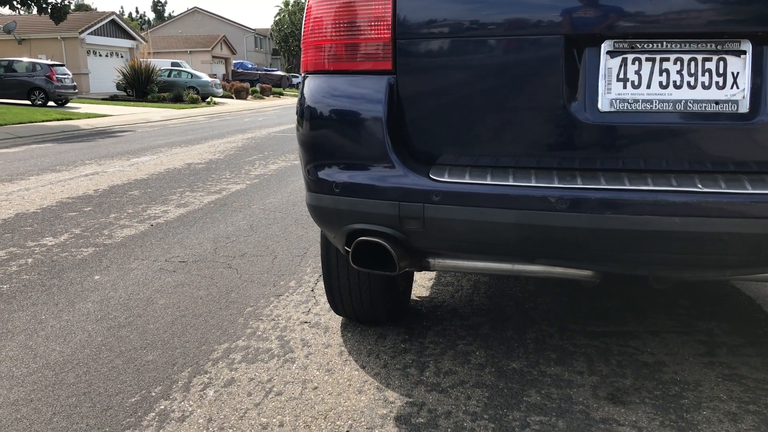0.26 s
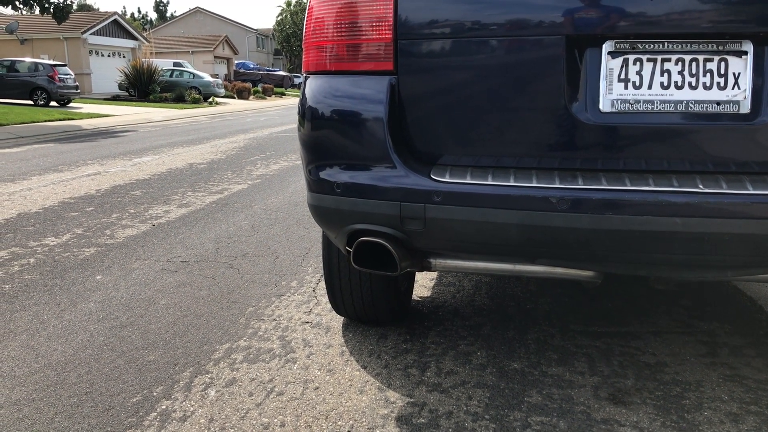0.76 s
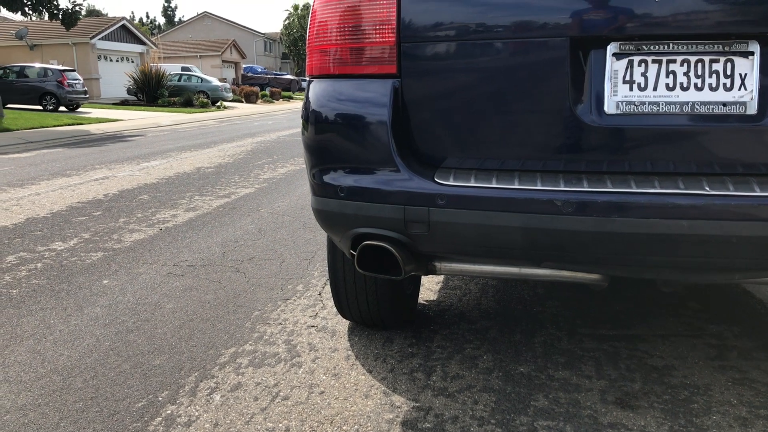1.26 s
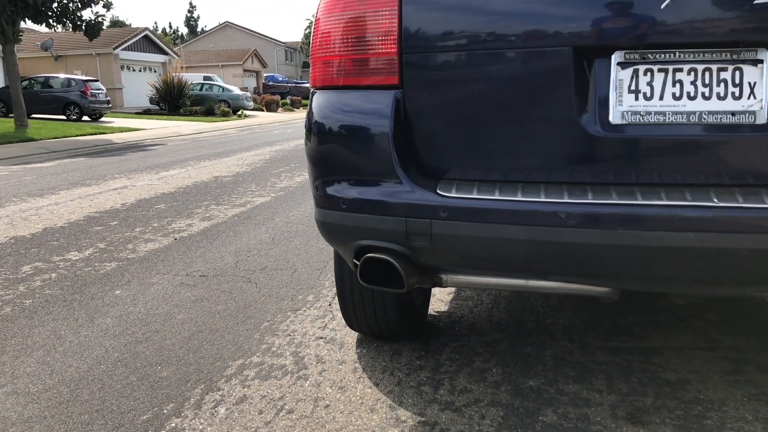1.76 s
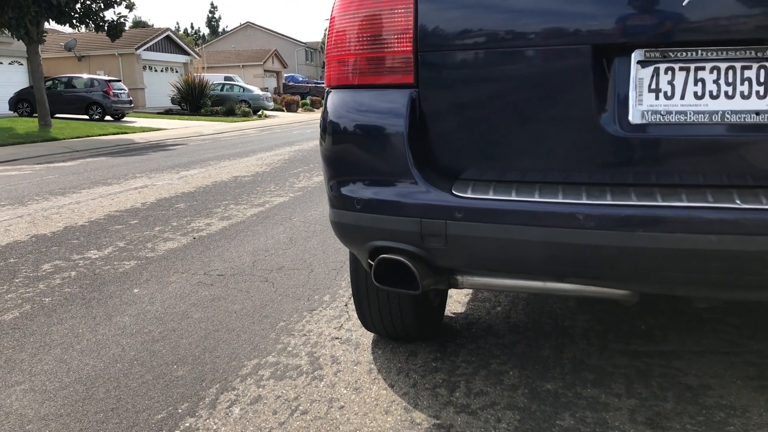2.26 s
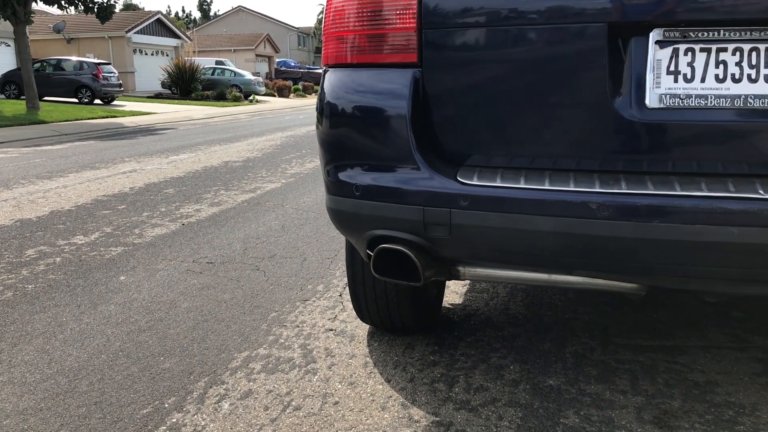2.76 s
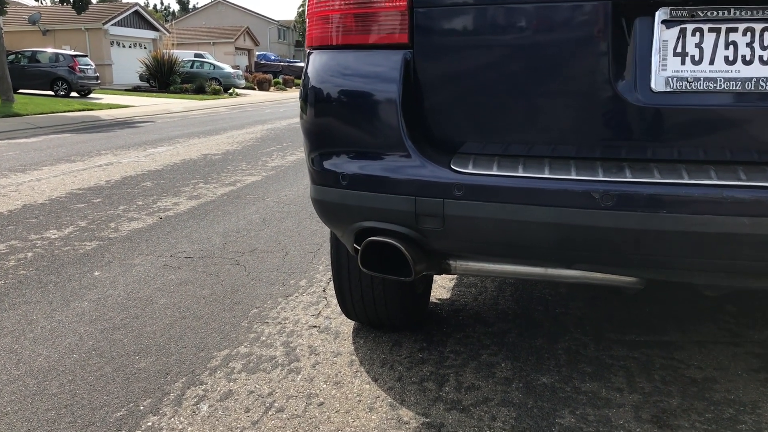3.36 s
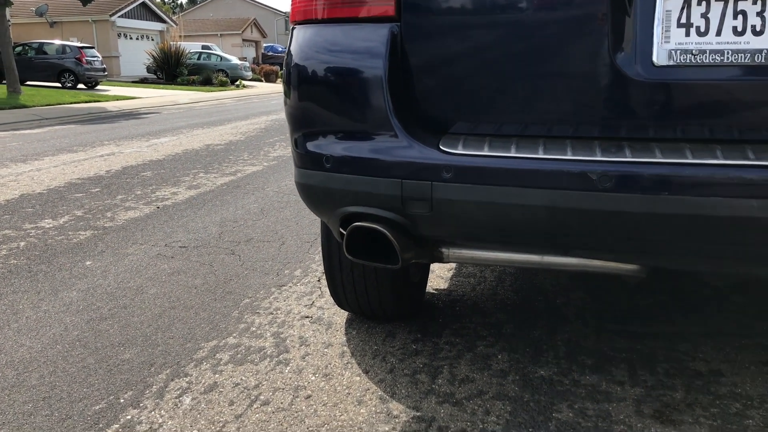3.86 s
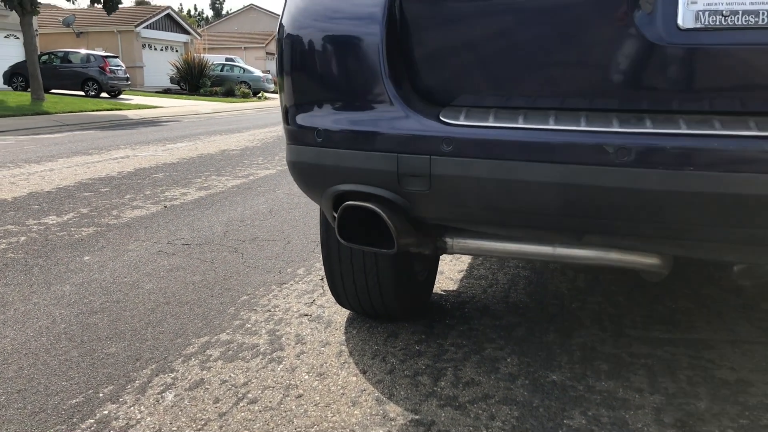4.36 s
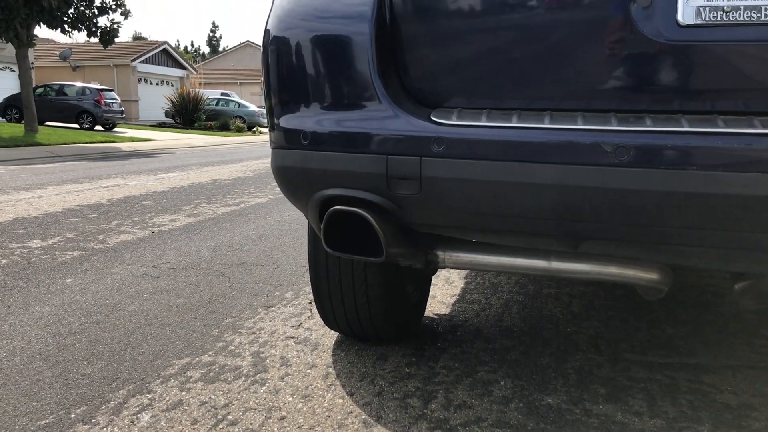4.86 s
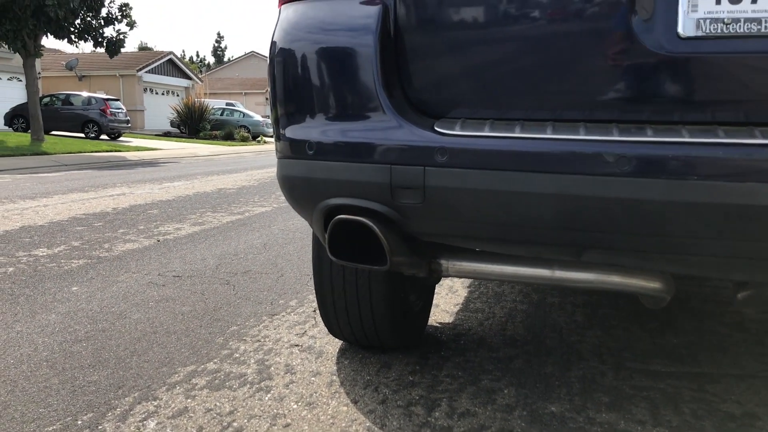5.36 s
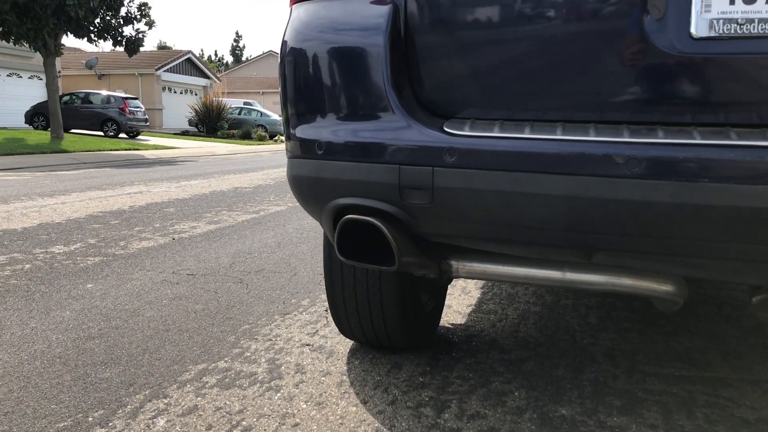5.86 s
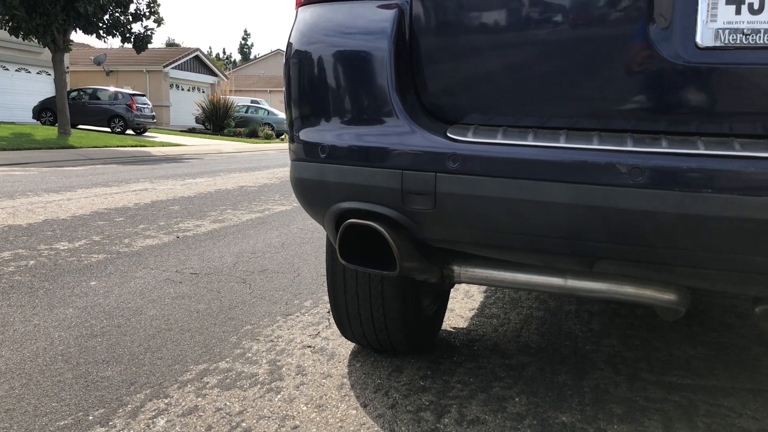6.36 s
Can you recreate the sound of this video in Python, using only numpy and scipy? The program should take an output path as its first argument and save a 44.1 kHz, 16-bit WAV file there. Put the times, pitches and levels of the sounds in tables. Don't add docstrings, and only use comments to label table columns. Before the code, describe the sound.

Close behind a vehicle's tailpipe on a quiet residential street, a V8 idles from 0 s with a deep, uneven, bubbling boom, sagging slightly around 0.75 s. A thin, unsteady high whine and soft street noise lie beneath it, and a shoe scrapes briefly on grit at 0.2 s. From about 1.0 s the engine climbs; a tiny spit of air at 1.3 s leads into a full, raspy roar peaking near 1.8 s, with a cluster of hard pops until 2.0 s. The pitch slides down to a lumpy rumble by 3.4 s. At 4.2 s the throttle opens again, with another faint scuff at 4.4 s, and the revs rush to a higher, harsher peak around 5.0 s, crackling densely and slightly clipping. They drop quickly, hover near 5.6 s, then sink towards a burble by 6.6 s, with a long faint scrape after 6 s.

```python
import sys
import numpy as np
from scipy import signal
from scipy.fft import rfft, irfft, next_fast_len
from scipy.io import wavfile
from scipy.ndimage import uniform_filter1d, map_coordinates

SR = 44100
rng = np.random.default_rng(int(sys.argv[2]) if len(sys.argv) > 2 else 0)


def unload_audio(sound):
    columns = np.transpose(np.atleast_2d(sound))
    steps = np.round(np.clip(columns, -1, 1) * 32767)
    wavfile.write(sys.argv[1], SR, steps.astype(np.int16))


def volts(x):
    e = np.asarray(x, float) / 20
    return 10 ** e


N = 291060
T = np.arange(N) / SR


def unit(x):
    return x / np.sqrt(np.mean(x ** 2) + 1e-20)


def steady(x, reference, seconds):
    size = int(seconds * SR)
    power = uniform_filter1d(uniform_filter1d(reference ** 2, size), size)
    return x / np.sqrt(np.abs(power) + 1e-12)


def curves(rows):
    seconds, *columns = np.transpose(rows)
    return [np.interp(T, seconds, column) for column in columns]


def wobble(rate, step=1):
    knots = rng.standard_normal(int(N * rate / SR) + 4)
    return map_coordinates(knots, [T[::step] * rate])


def filtered(x, response):
    size = next_fast_len(N + SR // 2)
    return irfft(rfft(x, size) * response(np.fft.rfftfreq(size, 1 / SR)), size)[:N]


def resonances(modes):
    def response(f):
        total = 0
        for k, (hz, width, db) in enumerate(modes):
            damping = 1j * f * width
            total = total + (-1) ** k * volts(db) * damping / (hz * hz - f * f + damping)
        return total
    return response


def coloured(spectrum):
    hz, db = np.transpose(spectrum)
    noise = rng.standard_normal(N)
    return unit(filtered(noise, lambda f: volts(np.interp(np.log(f + 1), np.log(hz), db))))


def puffs(at, sizes, t60, noisy):
    clicks = np.bincount(at, sizes, N)[:N]
    gusts = signal.lfilter([1], [1, -volts(-60 / (t60 * SR))], clicks)
    gusts = uniform_filter1d(gusts, size=40, origin=19)
    return clicks + noisy * gusts * rng.standard_normal(N)


# time in seconds, speed in firings per second.
FIRING_RATE = [(0, 39), (.24, 39.6), (.75, 34.5), (.98, 35), (1.2, 45), (1.32, 56.3), (1.76, 102.5),
               (2.64, 63.2), (3.4, 42), (4.2, 47.3), (4.4, 55), (4.79, 87.5), (4.93, 116.5), (5.04, 125.5),
               (5.17, 121.7), (5.5, 83.5), (5.66, 83.5), (6.6, 49)]
# time in seconds, opening from 0 to 1.
THROTTLE_OPENING = [(0, 0.03), (.95, 0.07), (1.3, 0.67), (1.68, 0.77), (1.82, 0.79), (2.12, 0.34),
                    (2.5, 0.37), (2.83, 0.29), (3.5, 0), (4.2, 0), (4.58, 0.64), (4.78, 0.93), (4.96, 0.49),
                    (5.05, 0.37), (5.35, 0), (5.88, 0.08), (6.25, 0.21), (6.6, 0)]
# full from and until in seconds, strength from 0 to 1.
PIPE_BURNS = [
    (1.76, 2.019, .7),
    (4.999, 5.125, 0.86),
]
BURN_RISE_S, BURN_FALL_S = 0.33, 0.1
# time in seconds, gain in dB.
GAIN_CONTROL = [(0, 1.5), (1.2, 1.5), (2.3, -2.5), (3.2, 2), (4.5, 4), (5.5, -0.5), (5.8, -6.5), (6.1, 4),
                (6.6, 4)]


def engine():
    rate = uniform_filter1d(curves(FIRING_RATE)[0], size=2000)
    throttle, = curves(THROTTLE_OPENING)
    burn = np.zeros(N)
    for start, end, strength in PIPE_BURNS:
        burn += strength * np.interp(T, [start - BURN_RISE_S, start, end, end + BURN_FALL_S], [0, 1, 1, 0])
    octaves = np.log2(rate / 50)
    controls = np.array([np.ones(N), octaves, throttle, burn, curves(GAIN_CONTROL)[0]])
    return rate, lambda law: np.dot(law, controls)


def firings(turns, lag):
    late = np.floor(turns - lag)
    at = np.flatnonzero(np.diff(late)) + 1
    return at, late[at].astype(int)


def in_pipe(points, hz):
    f, db = np.transpose(points)
    return np.interp(np.log(hz), np.log(f), db)


# level in dB of the crank line k/8 above a firing order, k = 0..7.
CRANK_LINES = [0, -14, -8, 0, -17.5, -7, -1, -10.5]
# frequency in Hz, width in Hz, level in dB.
PIPE_MODES = [(44, 6.3, 1.5), (97.4, 28.1, -0.5), (118.5, 11.4, -2), (139.6, 14.1, -0.5),
              (192.5, 13.5, -0.5)]


def burble(rate, turns):
    step, grid_hz = 20, np.arange(600.)
    pipe = resonances(PIPE_MODES)
    gain = np.abs(pipe(grid_hz)) / (1 + (grid_hz / 235) ** 6)
    lines = np.zeros(len(T[::step]))
    for k in range(4, 41):
        if k in (8, 16):
            continue
        order = k / 8
        size = volts(CRANK_LINES[k % 8] + 2.2 * wobble(4, step)) * np.interp(order * rate[::step], grid_hz, gain)
        thin = min(order, 1) ** 0.38
        phase = 2 * np.pi * (order * turns[::step] + rng.random()) + .22 * wobble(5, step)
        lines += thin * size * np.cos(phase)
    lines = unit(signal.resample_poly(lines, step, 1)[:N])
    turbulence = unit(filtered(rng.standard_normal(N), lambda f: pipe(f) * np.minimum(f / 110, 1) ** 2))
    return lines + np.clip(rate / 550, 0, 1) * turbulence


# frequency in Hz, width in Hz, level in dB.
UPPER_PIPE_MODES = [(223.3, 16.7, 4.5), (278.6, 16.5, 2), (301.2, 12.8, 0), (339.3, 24.3, -1.5),
                    (402.1, 7.5, -4.5), (438.2, 11, -7.5), (514, 35, -13)]
# frequency in Hz, gain in dB.
FIRST_ORDER_GAIN = [(41, -40), (48, -19.5), (54, -28.5), (62, -24), (71, -33), (81, -16.5), (105, -11),
                    (126, -15.5)]
SECOND_ORDER_GAIN = [(70, -31), (80, -25.5), (113, -27.5), (128, -30), (142, -23), (160, -44.5),
                     (192, -32.5), (230, -68.5)]
# dB at 50 firings per second, dB per octave of speed,
# dB at full throttle, dB at full afterburn, share of the gain control.
FIRST_LAW = (-1.24, -0.83, 11.5, -6, 0.38)
SECOND_LAW = (0.22, 0.3, 8.5, 14.5, .6)
BURBLE_LAW = (-30.5, 3, 12, 0, 0.41)
ROAR_LAW = (-46.5, 14.5, 8, 7, 0.24)
STALL_RATE, STALL_DB_PER_OCT = 40.2, 18


def boom(rate, turns, level):
    first_db = level(FIRST_LAW) + in_pipe(FIRST_ORDER_GAIN, rate)
    second_db = level(SECOND_LAW) + in_pipe(SECOND_ORDER_GAIN, 2 * rate) + 3.0 * wobble(6)
    clean = volts(first_db) * np.cos(2 * np.pi * turns) + volts(second_db) * np.cos(4 * np.pi * turns - .6)

    low = burble(rate, turns)
    upper = filtered(low, lambda f: f > 125)
    stall_db = STALL_DB_PER_OCT * np.minimum(np.log2(rate / STALL_RATE), 0)
    burbling = volts(level(BURBLE_LAW) + stall_db) * steady(low, upper, seconds=0.14)

    at, number = firings(turns, lag=0.2977)
    sizes = volts(3.5 * rng.standard_normal(1000)[number % 1000])
    gas = unit(puffs(at, sizes, t60=.04, noisy=.08)) + .45 * rng.standard_normal(N)
    roar = filtered(gas, resonances(UPPER_PIPE_MODES))
    return np.sqrt(2) * clean + burbling + volts(level(ROAR_LAW)) * steady(roar, roar, seconds=0.085)


def aside(f):
    return 1 / (1 + 1.4j * f / 6000 - (f / 6000) ** 2) ** 2


# frequency in Hz, width in Hz, level in dB.
BOX_MODES = [(608, 73, -4), (657.5, 32, 3), (885, 191, 3), (1054, 75, -4), (1104, 41, -10.5),
             (1262, 120, -10.5)]


def box(f):
    return resonances(BOX_MODES)(f) * aside(f) / (1 + 1j * f / 2500)


def tip_mode(mode):
    hz, width, db = mode
    return lambda f: volts(db) * resonances([(hz, width, 0)])(f) ** 2 * aside(f)


# frequency in Hz, width in Hz, level in dB.
TIP_MODES = [(1859, 550, -2), (2744, 450, -5), (3414, 280, -6.5), (4200, 1800, -13), (5800, 1300, -14.5)]
BOX_LAW = (-55, 11, 5, 16.5, 1.14)
TIP_LAW = (-58.5, 6.5, 18, 9, 0.62)


def rasp(turns, box_db, tip_db):
    at, number = firings(turns, lag=.3)
    luck = rng.standard_normal((1000, 1 + len(TIP_MODES)))[number % 1000]
    opened = np.clip((box_db + 62) / 25, .5, .62)
    swirl = (1 - opened) * volts(2.6 * wobble(18))

    def ring(response, size_db):
        blasts = unit(puffs(at, volts(size_db), t60=.021, noisy=.4))
        return filtered(opened * blasts + swirl * rng.standard_normal(N), response)

    low = ring(box, 2.4 * luck[:, 0])
    tip = np.zeros(N)
    for k, mode in enumerate(TIP_MODES):
        tip += ring(tip_mode(mode), 1.5 * luck[:, 0] + 3 * luck[:, k + 1])
    low = volts(box_db - 0.46) * steady(low, low, seconds=0.21)
    return low + volts(tip_db - 5.56) * steady(tip, tip, seconds=0.033)


# frequency in Hz, density in dB per Hz.
JET_COLOUR = [(4710, -6.5), (8000, -3), (9570, -6.5), (10400, -7.5), (12800, -5.5), (15800, -12.5)]
HISS_LAW = (-71.5, 9.5, 13, -2.5, 0.8)


def jet(turns, jet_db):
    puffing = volts(3 * np.cos(2 * np.pi * turns) + 1.9 * wobble(22) + 2.5 * wobble(200))
    return volts(jet_db - 1.5) * unit(puffing * coloured(JET_COLOUR))


# time in seconds, frequency in Hz, level in dB.
PUMP_WHINE = [(0, 4500, -62), (.33, 4640, -69), (.5, 4740, -67), (.82, 4800, -74), (.92, 4910, -63),
              (1.05, 4935, -63), (1.65, 4935, -66), (2.2, 4930, -76), (2.8, 4935, -76), (2.9, 4945, -66),
              (3.6, 4955, -69), (4.15, 4965, -67), (4.8, 4970, -80), (6.6, 4970, -86)]


def pump():
    hz, db = curves(PUMP_WHINE)
    phase = 2 * np.pi * np.cumsum(hz + 2 * wobble(40)) / SR
    partials = [(1, 0), (2, -19), (.973, -11), (.945, -10), (1.864, -21)]  # (multiple, dB)
    tone = sum(volts(d) * np.sin(k * phase) for k, d in partials)
    return np.sqrt(2) * volts(db - 1 + 1.3 * wobble(14)) * tone


# frequency in Hz, density in dB per Hz.
STREET_COLOUR = [(130, -29.5), (220, 0), (338, -17.5), (466, -21.5), (588, -23), (691, -16), (953, -18.5),
                 (2250, -29), (4130, -32), (6460, -41), (7730, -42), (12700, -48.5), (15800, -54.5)]


def street():
    level_db = -46.5 + curves(GAIN_CONTROL)[0] + 0.52 * wobble(3.2)
    return volts(level_db) * coloured(STREET_COLOUR)


# start in seconds, length in seconds, start in Hz, end in Hz, level in dB.
SHOE_SCUFFS = [
    (.23, .12, 4000, 3500, -55),
    (6.05, .4, 3900, 3500, -60),
    (4.38, .13, 4200, 2800, -60),
]


def scuffs():
    out = np.zeros(N)
    for start, length, start_hz, end_hz, db in SHOE_SCUFFS:
        u = np.clip((T - start) / length, 0, 1)
        hz = start_hz + (end_hz - start_hz) * u
        carrier = np.sin(2 * np.pi * np.cumsum(hz) / SR)
        out += volts(db) * np.sin(np.pi * u) ** .5 * wobble(900) * carrier
    return out


# time in seconds, level in dB.
THROTTLE_SNAPS = [
    (1.302, -59.5),
    (4.191, -60),
]


def spit():
    snap_s = .025
    swell = sum(volts(db) * np.exp(-((T - s) / snap_s) ** 2) for s, db in THROTTLE_SNAPS)
    return swell * coloured(JET_COLOUR)


# time in seconds, peak in dB, brightness in dB.
LATE_BURNS = [(1.467, -23, -9), (1.767, -13.5, 2.5), (1.786, -9, -3), (1.794, -4.5, -26), (1.813, -20, 1),
              (1.824, -16.5, 4), (1.856, -22, 2.5), (1.866, -16.5, -1.5), (1.897, -27.5, -19),
              (1.94, -13.5, -13), (2.037, -25, -21), (5.27, -33, -27), (4.75, -16.5, -15),
              (4.806, -30.5, 2), (4.857, -11.5, -17), (4.912, -14, -1), (4.931, -12.5, -22),
              (4.956, -7, -38), (4.974, -5.5, -38), (5.011, -3.5, -9), (5.046, -7, -15), (5.064, -21, 5),
              (5.07, -12, -10), (5.085, -1, -31), (5.103, -2.5, -2), (5.111, 1.5, -8.5),
              (5.153, -14.5, -35), (5.243, -23.5, -15), (5.317, -21, -22), (5.461, -38.5, 5.5)]
# time in seconds, colour in Hz.
POP_COLOUR = [
    (1.8, 2350),
    (4.8, 1850),
]


def pops():
    s, db, bright_db = np.transpose(LATE_BURNS)
    at = (s * SR).astype(int)
    colour_hz = curves(POP_COLOUR)[0][at]
    out = filtered(puffs(at, volts(db + 30), t60=0.011, noisy=0.08), box)
    out += filtered(puffs(at, volts(db + 28), t60=0.01, noisy=0), resonances(PIPE_MODES[:1]))
    for mode in TIP_MODES:
        off_db = -13 * np.abs(np.log2(mode[0] / colour_hz))
        cracks = puffs(at, volts(db + bright_db + off_db + 24.0), t60=0.0092, noisy=0.51)
        out += filtered(cracks, tip_mode(mode))
    return out


# frequency in Hz, width in Hz, depth from 0 to 1.
PORT_DIPS = [(7730, 700, 0.43), (10400, 420, 0.4)]


def port(f):
    return np.prod([1 - np.clip(depth, 0, .9) * np.exp(-((f - hz) / width) ** 2)
                    for hz, width, depth in PORT_DIPS], axis=0)


def scene():
    rate, level = engine()
    turns = np.cumsum(rate) / SR
    exhaust = boom(rate, turns, level) + rasp(turns, level(BOX_LAW), level(TIP_LAW)) + pops()
    airy = filtered(jet(turns, level(HISS_LAW)) + spit() + street(), port)
    return (exhaust + pump() + scuffs() + airy)[None]


def top_cut(x):
    return signal.sosfilt(signal.butter(12, 16150, fs=SR, output="sos"), x)


def record(dry):
    bass_cut = signal.butter(8, 40, "high", fs=SR, output="sos")
    cut = signal.sosfilt(bass_cut, dry) * np.minimum(T / .004, 1)
    clipped = cut / (1 + np.abs(cut / 1.07) ** 8) ** (1 / 8)
    return top_cut(clipped)


dry = scene()
out = record(dry)
unload_audio(out)
```